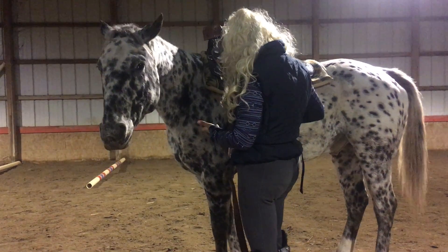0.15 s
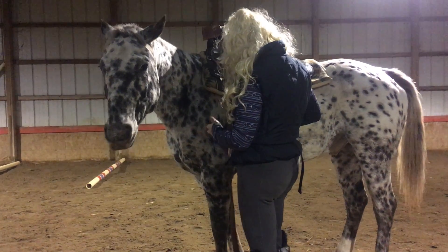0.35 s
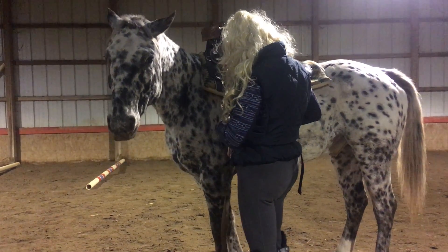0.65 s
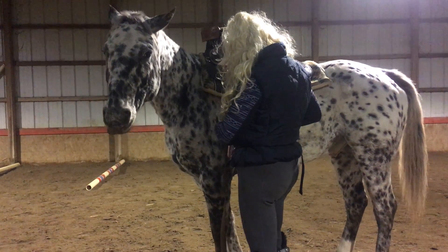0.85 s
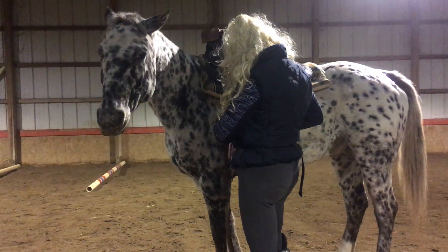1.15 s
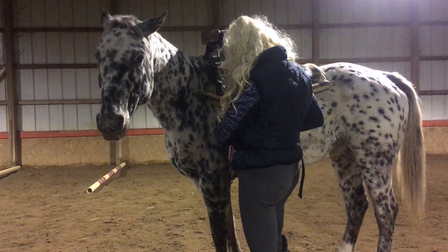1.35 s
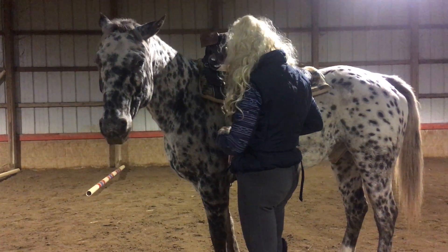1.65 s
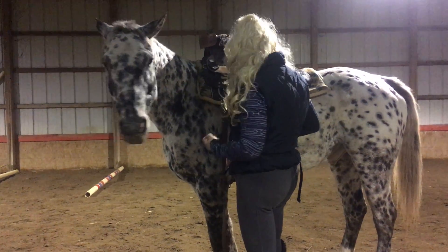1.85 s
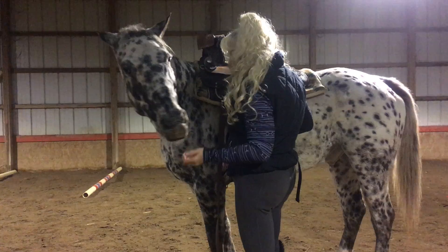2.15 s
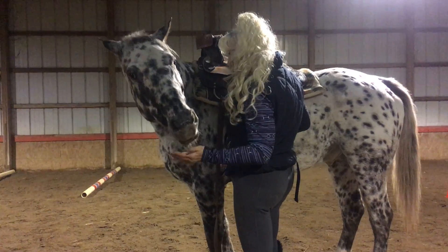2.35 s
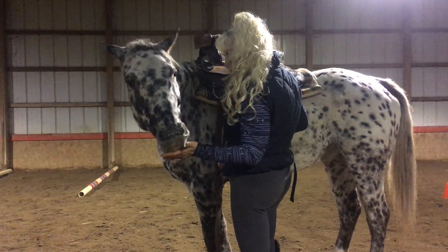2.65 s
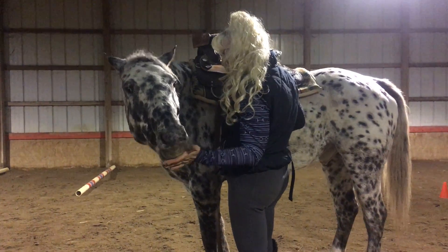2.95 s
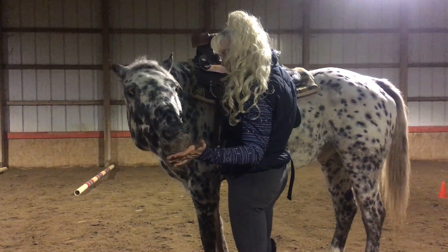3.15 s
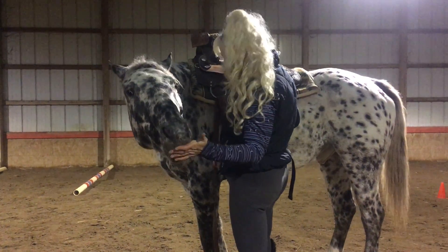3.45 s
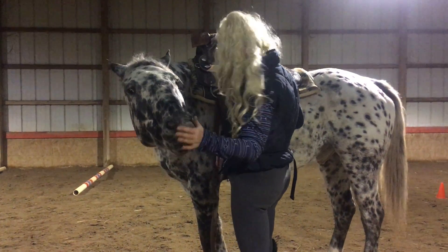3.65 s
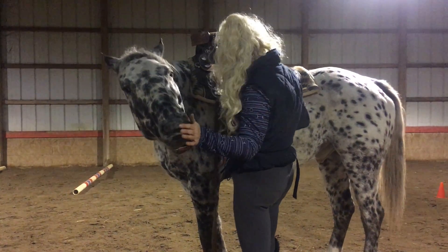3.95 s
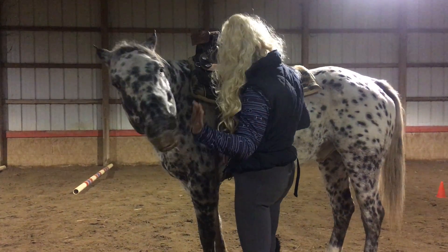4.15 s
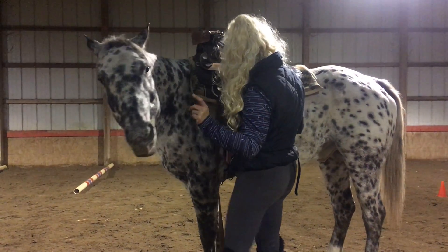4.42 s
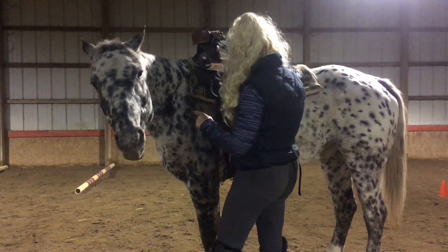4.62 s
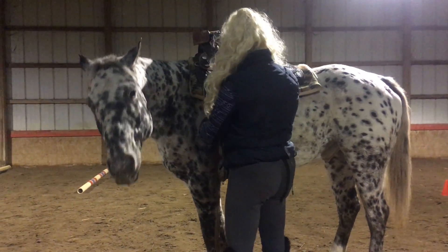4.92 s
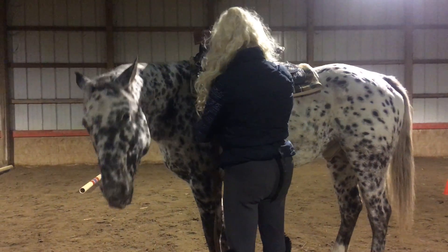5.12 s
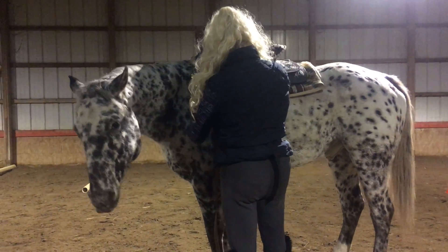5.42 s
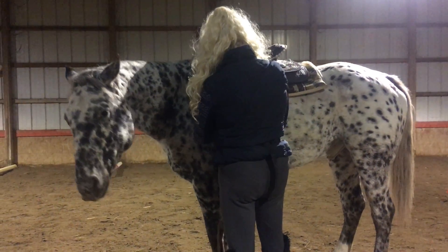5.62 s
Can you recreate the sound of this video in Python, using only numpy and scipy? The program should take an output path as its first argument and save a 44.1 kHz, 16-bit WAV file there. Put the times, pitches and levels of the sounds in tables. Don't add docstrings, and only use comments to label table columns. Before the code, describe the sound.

Rain falls on a wide metal roof above a sandy riding arena. Distant drops blend into a smooth hiss, nearer ones tick and patter, and single heavy drops plink metallically, some bursting into fine spray. An early short low hum and soft panel boom give way, late on, to a muffled burst of flapping thuds that fades as the rain continues. The mono pickup is from the floor, with slight microphone hiss.

```python
import sys
import numpy as np
from scipy import signal
from scipy.fft import rfft, irfft, next_fast_len
from scipy.io import wavfile
from scipy.ndimage import uniform_filter1d, map_coordinates

SR = 44100
rng = np.random.default_rng(int(sys.argv[2]) if len(sys.argv) > 2 else 0)


def wav_record(signal):
    frames = np.transpose(np.atleast_2d(signal))
    bounded = np.clip(frames, -1, 1)
    quanta = np.round(bounded * 32767).astype(np.int16)
    wavfile.write(sys.argv[1], SR, quanta)


def rack_gain(trim_db):
    fader = np.asarray(trim_db, float)
    return 10 ** (fader / 20)


N = 254898


def unit(x):
    return x / np.sqrt(np.mean(x ** 2) + 1e-20)


def curves(rows):
    s, *cols = np.transpose(rows)
    return [np.interp(np.arange(N) / SR, s, c) for c in cols]


def wobble(rate_hz):
    knots = rng.standard_normal(int(N * rate_hz / SR) + 4)
    return map_coordinates(knots, [np.arange(N) * rate_hz / SR])


def coloured(x, points):
    m = next_fast_len(N + 8192)
    f, db = np.transpose(points)
    log_hz = np.log(np.fft.rfftfreq(m, 1 / SR) + 1)
    gain = rack_gain(np.interp(log_hz, np.log(f), db))
    return irfft(rfft(x, m) * gain, m)[:N]


def noise(points):
    return unit(coloured(rng.standard_normal(N), points))


def swell(t, rise_s, t60_s):
    return (1 - np.exp(-t / rise_s)) * rack_gain(-60 * t / t60_s)


def tone(hz, t):
    return np.sin(2 * np.pi * hz * t)


def add(track, s, sound):
    part = track[round(s * SR):][:len(sound)]
    part += sound[:len(part)]


# time in seconds, level in dB.
RAIN_STRENGTH = [(0, -44), (0.4, -43.5), (0.74, -46), (1.02, -43.5), (1.15, -45.5), (1.5, -43.5),
                 (1.8, -46), (2.3, -43.5), (2.62, -50), (3.2, -44), (3.34, -47.5), (3.45, -43.5),
                 (3.9, -46), (4.4, -46), (4.78, -44), (5.4, -45), (5.7, -45), (5.78, -45.5)]


def strength_db():
    db, = curves(RAIN_STRENGTH)
    return db - db.mean()


# frequency in Hz, density in dB per Hz.
FAR_COLOUR = [(15, -54), (25, -38), (60, -6.5), (177, 0.5), (251, -2.5), (470, -6), (775, -3), (879, -0.5),
              (1380, -4), (1860, -8), (2860, -2.5), (3760, -13.5), (4260, -11.5), (4960, -25),
              (10000, -44.5), (13000, -82), (22000, -120)]


def far_rain():
    unsteady_db = 0.6 * wobble(5.28) + 0.25 * wobble(30)
    level_db = -43 + 0.12 * strength_db() + unsteady_db
    return rack_gain(level_db) * noise(FAR_COLOUR)


# start, rise, hold and fall in seconds, push in dB.
GUST_PUSHES = [
    (2.66, 0.05, 0.25, 0.085, 4),
    (3.515, 0.091, 0.12, .15, 2.5),
    (5.087, 0.1, 0.17, 0.68, 11),
]


def gust_db():
    now = np.arange(N) / SR
    push_db = np.zeros(N)
    for s, rise_s, hold_s, fall_s, db in GUST_PUSHES:
        corners_s = np.cumsum([0, rise_s, hold_s, fall_s])
        push_db += db * np.interp(now - s, corners_s, [0, 1, 1, 0])
    return push_db


# frequency in Hz, density in dB per Hz.
BOOM_COLOUR = [(60, -49), (110, -6), (170, 0.5), (220, -1), (290, -2), (350, -12), (600, -63)]
# frequency in Hz, density in dB per Hz.
RUMBLE_COLOUR = [(20, -41), (45, -7), (65, 0), (95, -5.5), (130, -10), (200, -57)]


def boom_and_rumble():
    push_db = gust_db()
    boom = rack_gain(-54 + push_db + 1.03 * wobble(7)) * noise(BOOM_COLOUR)
    rumble = rack_gain(-61 + 0.78 * push_db + 2.5 * wobble(4.0)) * noise(RUMBLE_COLOUR)
    return boom + rumble


# time in seconds, pitch in Hz, level in dB.
HUM_TRACK = [
    (0.64, 180, -65),
    (0.68, 180.4, -38.5),
    (0.752, 188.3, -56),
    (0.808, 186, -41),
    (0.898, 172, -45.5),
    (0.94, 172, -52),
]


def panel_hum():
    hz, db = curves(HUM_TRACK)
    now = np.arange(N) / SR
    to_edge_s = np.minimum(now - HUM_TRACK[0][0], HUM_TRACK[-1][0] - now)
    gate = np.clip(to_edge_s / 0.063, 0, 1)
    return gate * rack_gain(db - 1) * np.sin(2 * np.pi * np.cumsum(hz) / SR)


# time in seconds, peak in dB, mode in Hz.
FRAME_THUMPS = [(2.699, -39, 71), (3.079, -39, 124), (5.214, -26.5, 75.5), (5.25, -25.5, 92),
                (5.269, -27, 123), (5.3, -29, 71.5), (5.359, -31, 119), (5.37, -28.5, 85.5),
                (5.536, -46, 114), (5.57, -34, 124), (5.679, -37, 95)]


def frame_thumps():
    out = np.zeros(N)
    t = np.arange(SR // 4) / SR
    for s, db, hz in FRAME_THUMPS:
        add(out, s - .005, rack_gain(db) * swell(t, 0.015, 0.15) * tone(hz, t))
    return out


# time in seconds, peak in dB, ring in Hz.
PANEL_FLAPS = [(2.701, -37, 225), (2.791, -40.5, 218), (3.079, -37, 253), (3.658, -36.5, 285),
               (5.161, -34, 217), (5.19, -34, 188), (5.214, -21.5, 197), (5.252, -24, 208),
               (5.269, -26, 235), (5.307, -25.5, 215), (5.374, -33, 288), (5.415, -26, 232),
               (5.459, -28, 225), (5.498, -27, 275), (5.537, -29.5, 284), (5.571, -31.5, 226),
               (5.628, -33, 230), (5.708, -38, 245), (5.749, -33.5, 225)]


def panel_flaps():
    out = np.zeros(N)
    t = np.arange(SR // 4) / SR
    for s, db, hz in PANEL_FLAPS:
        t60_s = 0.097 * rack_gain(-0.069 * (db + 36))
        add(out, s - .005, rack_gain(db + 4) * swell(t, 0.0086, t60_s) * tone(hz, t))
    return out


def shaking(count, spread_db, t60_s):
    draw = rng.random((count, 2))
    at = (draw[:, 0] * N).astype(int)
    power = rack_gain(-2 * spread_db * np.log(draw[:, 1] + .015))
    kicks = np.bincount(at, power, N)
    decay = swell(np.arange(SR // 5) / SR, 0.0013, t60_s) ** 2
    return np.sqrt(abs(signal.fftconvolve(kicks, decay)[:N]))


# frequency in Hz, density in dB per Hz.
SHEET_COLOUR = [(410, -7.5), (700, -6), (999, -4.5), (1860, -2.5), (2380, 1.5), (2970, 1), (3710, -4),
                (4340, -3), (4960, -14), (10000, -34), (13000, -51), (22000, -120)]
# frequency in Hz, density in dB per Hz.
SPRAY_COLOUR = [(3500, -39), (5000, 0), (7000, -10.5), (9000, -38), (10300, -37), (11500, -32),
                (15800, -42)]


def patter():
    shake = unit(shaking(count=800, spread_db=0.0, t60_s=0.22))
    ticks = unit(shaking(count=500, spread_db=2.8, t60_s=0.025))
    bursts = unit(shaking(count=300, spread_db=3.5, t60_s=0.059))
    sheet = unit((shake + 0.4 * ticks) * noise(SHEET_COLOUR))
    spray = unit((shake + 0.29 * ticks + bursts) * noise(SPRAY_COLOUR))
    return rack_gain(-48.5 + 2.5 * strength_db()) * (sheet + rack_gain(-21.0) * spray)


# time in seconds, peak in dB.
DROPLET_CLICKS = [(0.183, -58), (0.598, -55), (0.7582, -48), (1.1847, -52), (1.2191, -51), (1.957, -49),
                  (2.306, -56), (3.281, -50), (3.555, -50), (3.674, -53), (3.823, -58), (4.2547, -48),
                  (4.9636, -54)]


def clicks():
    snaps = np.zeros(N)
    t = np.arange(130) / SR
    for s, db in DROPLET_CLICKS:
        add(snaps, s, rack_gain(db + 2) * swell(t, .0002, .006) * rng.standard_normal(130))
    return coloured(snaps, [(6000, -40), (7500, -7), (10000, -1), (15500, -4)])


# time in seconds, peak in dB, centre in Hz.
BRIGHT_SPLASHES = [(0.3726, -59, 7370), (0.411, -69, 7220), (0.5965, -51.5, 7860), (0.8535, -47, 7800),
                   (1.2206, -49, 7010), (1.2905, -58, 8390), (1.5579, -48, 7120), (1.8906, -45, 7000),
                   (1.9684, -52, 6950), (2.2114, -51, 6910), (2.2443, -56, 8410), (2.3675, -48, 7200),
                   (2.4279, -57, 7100), (3.0465, -46, 7200), (3.2795, -47, 7040), (3.3737, -51, 7220),
                   (3.384, -46, 7650), (3.4174, -45, 7010), (3.5174, -56, 7150), (3.5483, -46, 6860),
                   (3.5574, -46, 8350), (3.6496, -51, 7120), (3.6731, -40, 7300), (3.7084, -49, 6940),
                   (4.2552, -47, 7060), (4.7242, -52, 7520), (4.8898, -50, 7130), (5.199, -46, 7560),
                   (5.5438, -62, 7330), (5.685, -47, 6800)]
# frequency in Hz, density in dB per Hz.
MIST_COLOUR = [(9500, -40), (10500, -10), (11200, 2), (16000, -2)]


def splashes():
    ping, mist = np.zeros((2, N))
    t = np.arange(SR // 8) / SR
    for s, db, hz in BRIGHT_SPLASHES:
        burst_and_tail = 2.6 * swell(t, 0.0018, 0.015) + swell(t, .003, .055)
        flutter = unit(uniform_filter1d(rng.standard_normal(len(t)), size=22))
        add(ping, s - .002, rack_gain(db - 7.5) * burst_and_tail * flutter * tone(hz, t))
        mist_db = -66 + 0.3 * (db + 50)
        add(mist, s - .002, rack_gain(mist_db) * swell(t, .003, 0.053))
    ping = coloured(ping, [(5000, -30), (6500, -3), (9500, 2.5), (11000, -30)])
    return ping + mist * noise(MIST_COLOUR)


# time in seconds, peak in dB, ring in Hz, noisy shake in dB.
DRY_DROPS = [(0.08, -29.5, 2680, -6), (0.1064, -36, 2450, -8), (0.199, -30.5, 2650, -11),
             (0.7976, -33, 2910, -18), (0.8113, -28.5, 2500, -8), (0.9171, -28, 2640, -7),
             (0.9727, -35, 2860, -11), (0.9993, -29.5, 2820, -10), (1.271, -32, 2880, -14),
             (1.3078, -26.5, 2990, -10), (1.3977, -26, 2720, -9), (1.8428, -25.5, 2370, -10.5),
             (1.9187, -30.5, 2340, -5.5), (2.306, -26, 2910, -5.5), (2.5274, -31.5, 3220, -6),
             (2.8045, -30.5, 2930, -4), (2.8459, -34, 2870, -7), (2.9442, -29, 2955, -6.5),
             (3.515, -27.5, 3200, -9), (3.747, -26.5, 2660, -9), (3.8512, -32.5, 2500, -5),
             (3.9514, -32.5, 2740, -10), (4.0844, -28.5, 2670, -5.5), (4.167, -29, 2710, -7),
             (4.4179, -35, 2750, -7), (4.674, -38, 2860, 0), (4.7443, -29.5, 2990, -5.5),
             (5.2017, -32, 4400, -14), (5.4918, -33, 2610, -9), (5.692, -28.5, 2690, -5)]
# time in seconds, peak in dB, ring in Hz, spray in dB.
WET_DROPS = [(0.3765, -41, 2330, -23), (0.448, -33.5, 2900, -30), (0.5975, -33, 2950, -17),
             (1.2222, -32, 3020, -20), (1.6496, -36, 2520, -20), (1.71, -43, 2630, -25),
             (1.9583, -29, 2750, -24), (2.212, -29, 2970, -21), (2.3695, -35, 2900, -20),
             (2.888, -34, 2900, -16), (3.099, -40, 2780, -14), (3.187, -33, 2620, -23),
             (3.2826, -36, 2960, -21), (3.3725, -30.5, 2820, -17), (3.4204, -29.5, 2750, -19.5),
             (3.5535, -31, 2580, -17), (3.6608, -33, 3200, -22), (3.6745, -33.5, 2760, -11.5),
             (4.0542, -37, 2630, -15), (4.258, -26.5, 3030, -26), (4.452, -34.5, 2870, -21),
             (4.5724, -37.5, 2900, -20), (4.6304, -29.5, 2860, -23), (4.7252, -35, 2930, -24),
             (4.813, -37.5, 2770, -12), (5.0886, -29, 2350, -18), (5.185, -40, 2750, -11),
             (5.2799, -33.5, 2920, -19), (5.3901, -37, 3050, -16), (5.5448, -32, 2750, -17)]
# frequency in Hz, density in dB per Hz.
UPPER_COLOUR = [(3300, -42), (3800, -9), (4300, 12), (4700, 5), (5100, -40)]


def heavy_drops():
    drops = []
    for s, db, hz, shake_db in DRY_DROPS:
        drops.append((s, db, hz, -37, -22.5, shake_db))
    for s, db, hz, spray_db in WET_DROPS:
        upper_db = -8.5 + 0.3 * (spray_db + 18.5)
        shake_db = -3.5 + 0.3 * (spray_db + 15.5)
        drops.append((s, db, hz, spray_db, upper_db, shake_db))

    shake, upper, spray, ring = np.zeros((4, N))
    t = np.arange(SR // 5) / SR
    strike = swell(t, .003, .04) ** 2
    for s, db, hz, spray_db, upper_db, shake_db in drops:
        t60_s = .045 * rack_gain(0.36 * (shake_db + 21.5))
        add(shake, s - .002, rack_gain(db + shake_db) * swell(t, 0.0059, t60_s))
        add(upper, s - .001, rack_gain(db + upper_db - 2.5) * swell(t, 0.001, 0.04))
        add(spray, s - .003, rack_gain(db + spray_db - 0.5) * swell(t, 0.001, t60_s))
        add(ring, s - .002, rack_gain(db + 11) * strike * tone(hz, t))
    noisy = shake * noise(SHEET_COLOUR) + upper * noise(UPPER_COLOUR) + spray * noise(SPRAY_COLOUR)
    return noisy + ring


def scene():
    roof = boom_and_rumble() + panel_hum() + frame_thumps() + panel_flaps()
    rain = far_rain() + patter() + clicks() + splashes() + heavy_drops()
    return (roof + rain)[None]


def low_pass(x):
    return signal.sosfilt(signal.butter(12, 16790, fs=SR, output="sos"), x)


# frequency in Hz, density in dB per Hz.
MIC_COLOUR = [(5000, -40), (8500, 1), (10000, 4), (10400, -9), (10900, 8), (11500, 9), (14000, 9),
              (15000, 11.5), (15500, 9), (16000, 1)]


def record(dry):
    top_hz = 15770
    with_hiss = dry[0] + rack_gain(-77) * noise(MIC_COLOUR)
    heard = coloured(with_hiss, [(top_hz - 20, 0), (top_hz + 20, -60)])
    return low_pass(heard[None])


dry = scene()
out = record(dry)
wav_record(out)
```